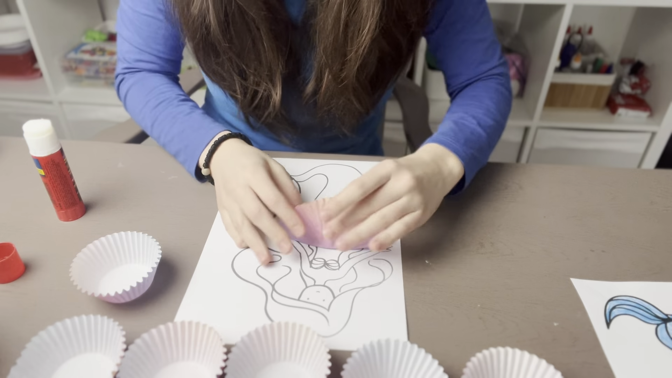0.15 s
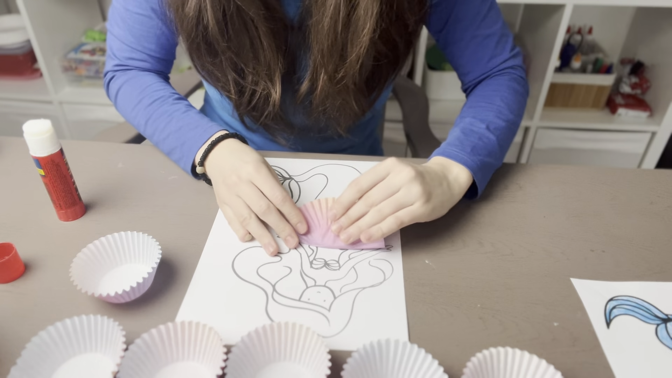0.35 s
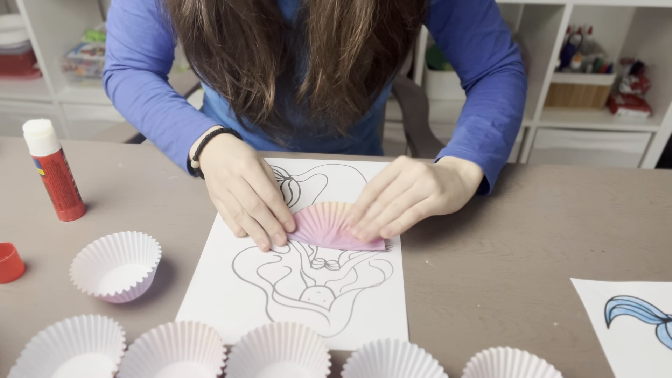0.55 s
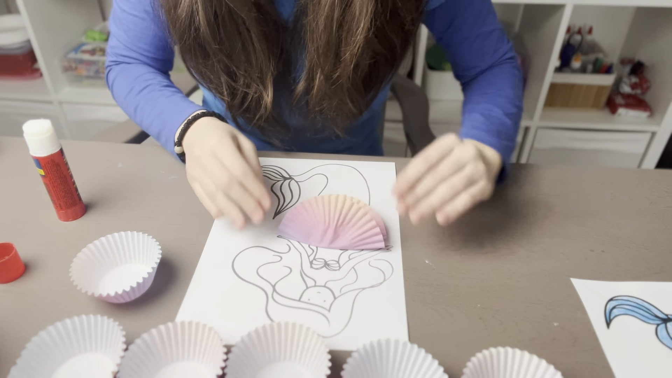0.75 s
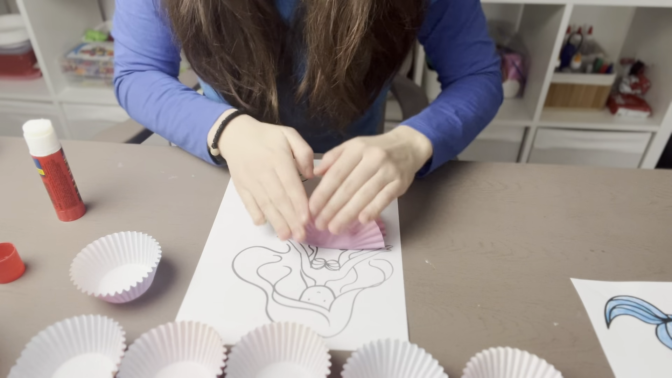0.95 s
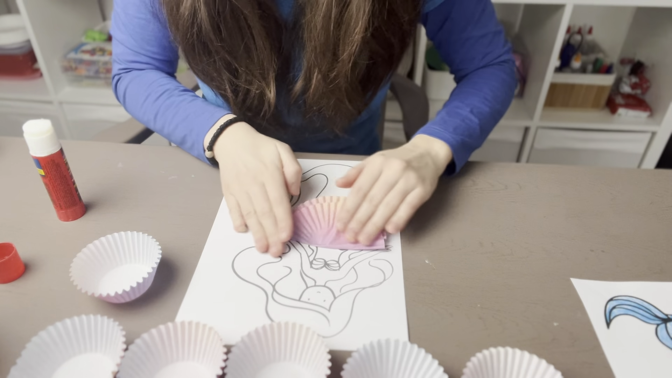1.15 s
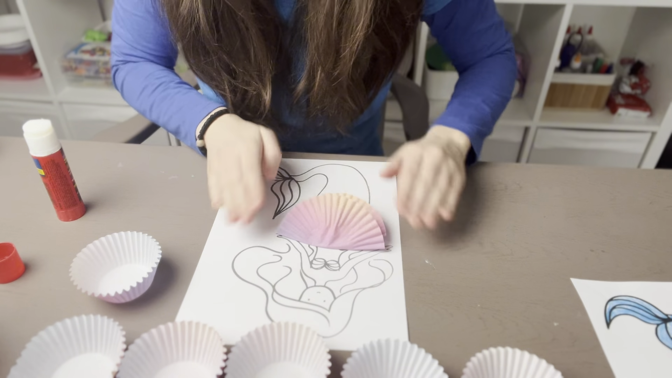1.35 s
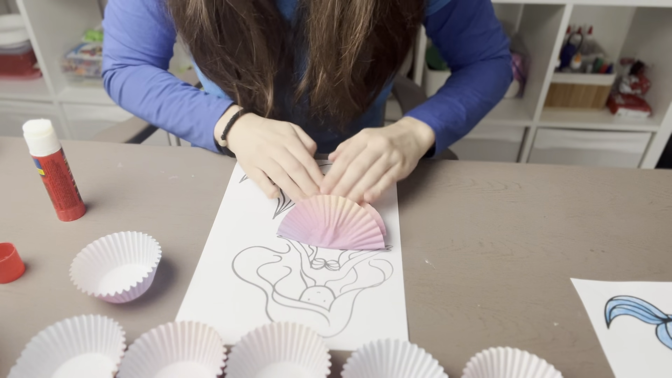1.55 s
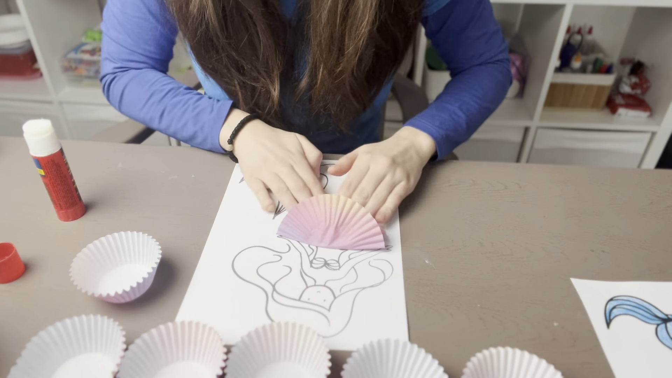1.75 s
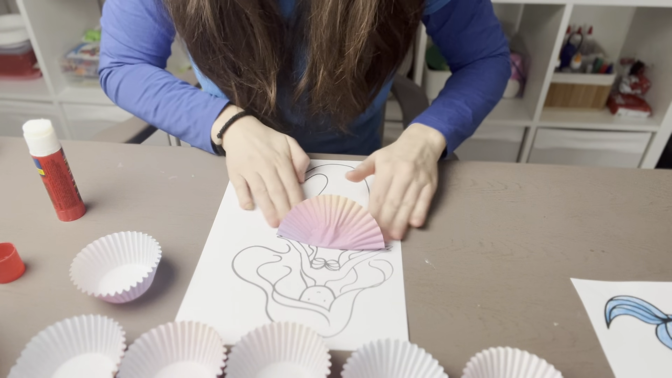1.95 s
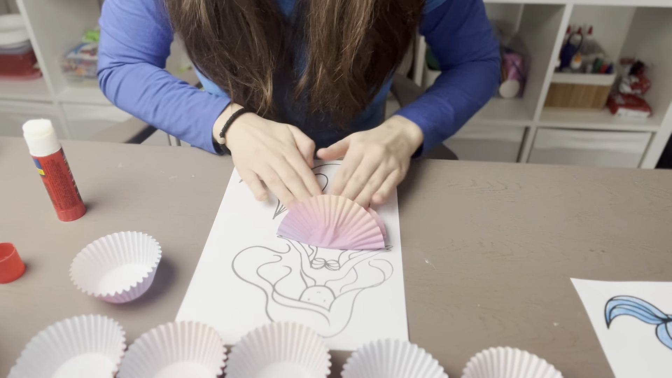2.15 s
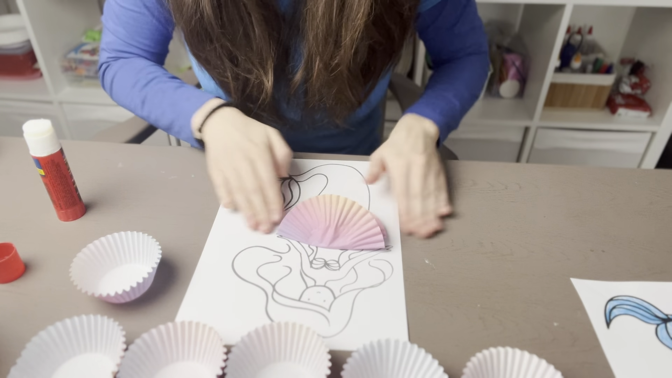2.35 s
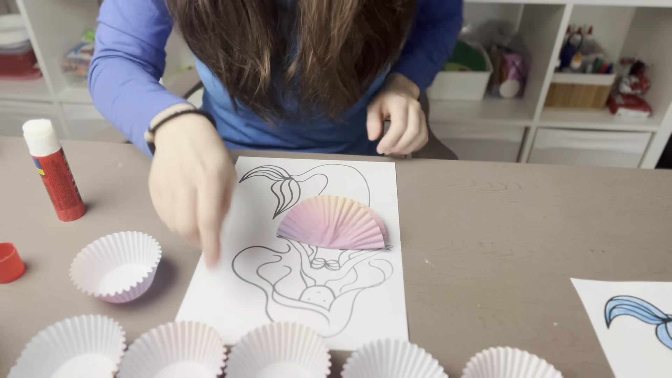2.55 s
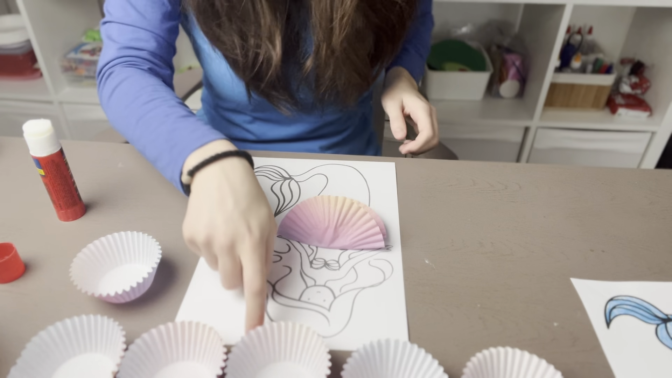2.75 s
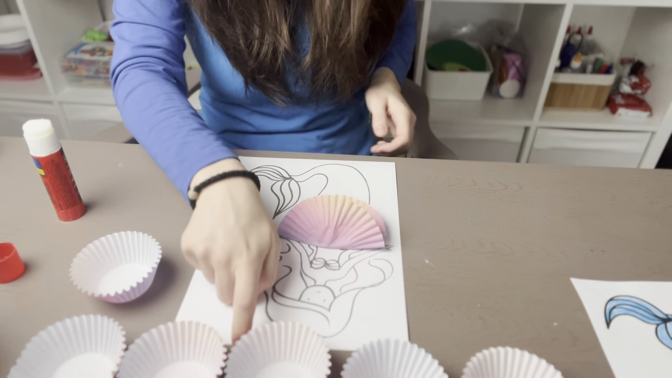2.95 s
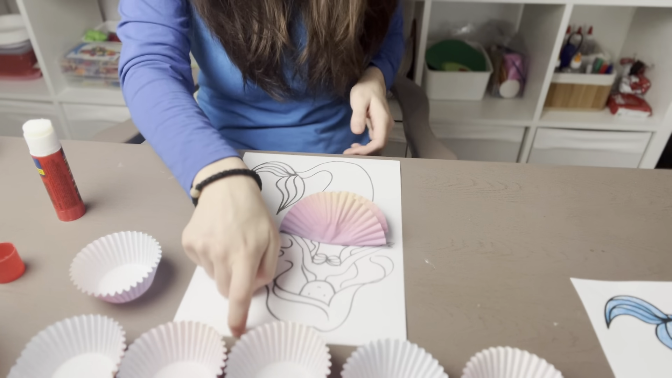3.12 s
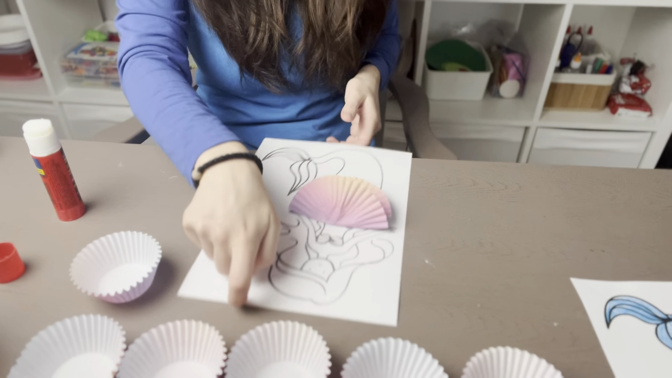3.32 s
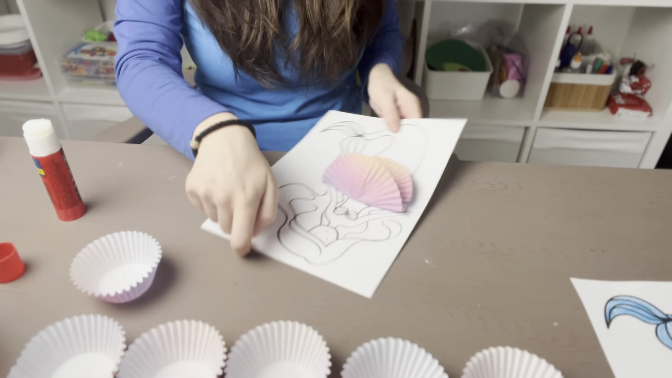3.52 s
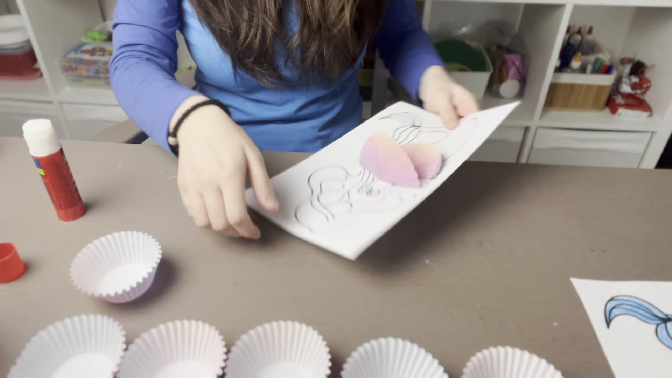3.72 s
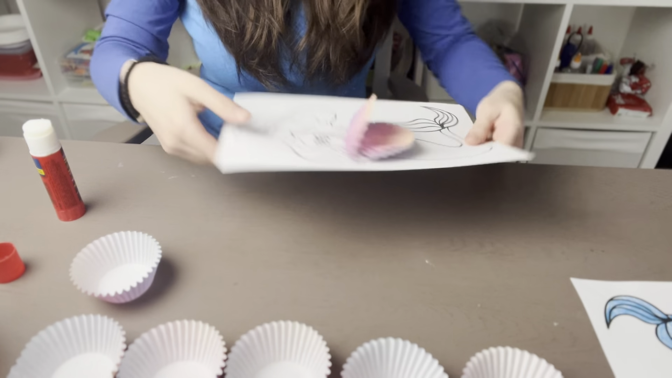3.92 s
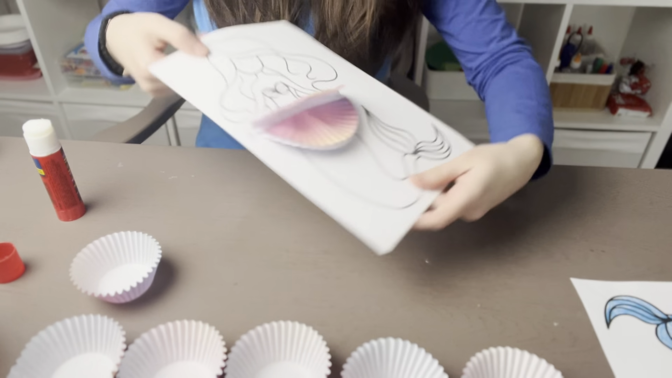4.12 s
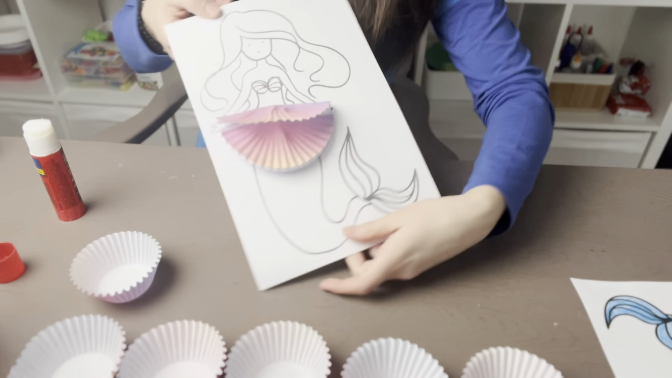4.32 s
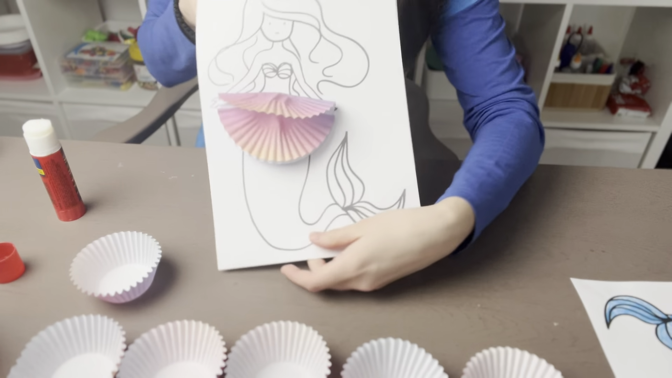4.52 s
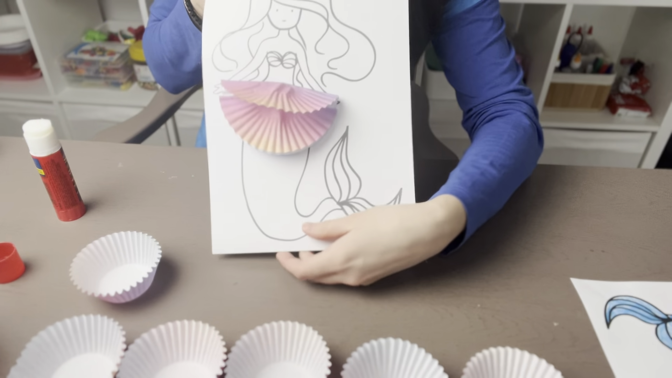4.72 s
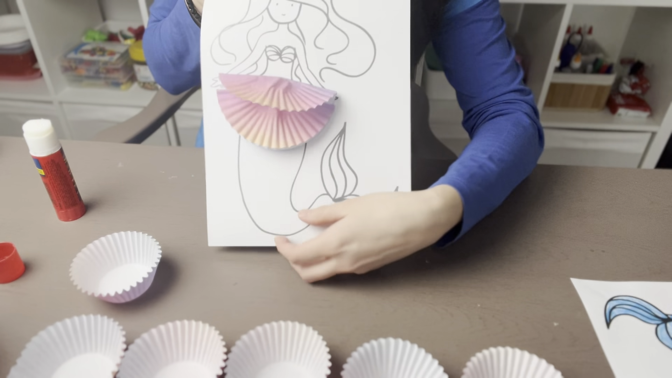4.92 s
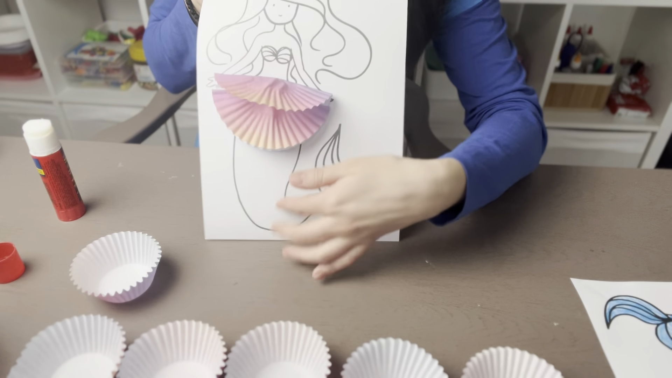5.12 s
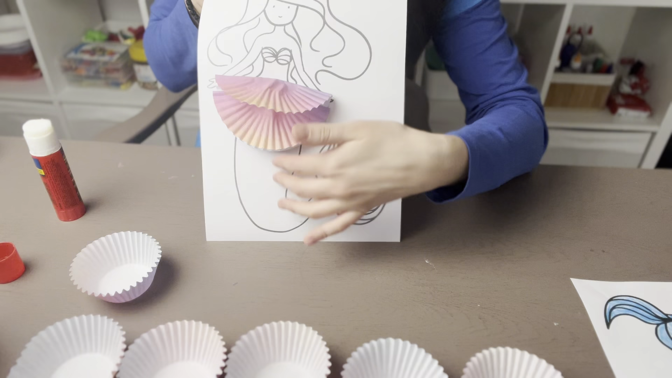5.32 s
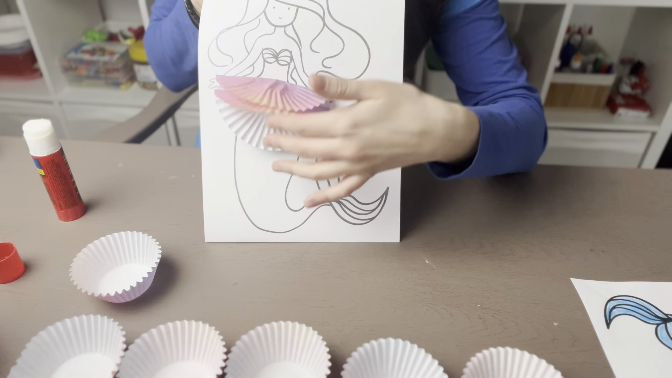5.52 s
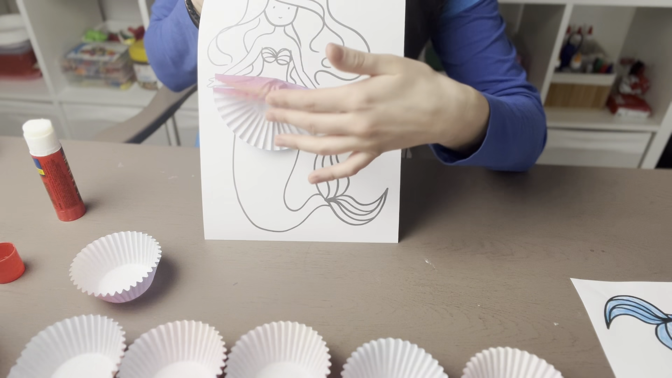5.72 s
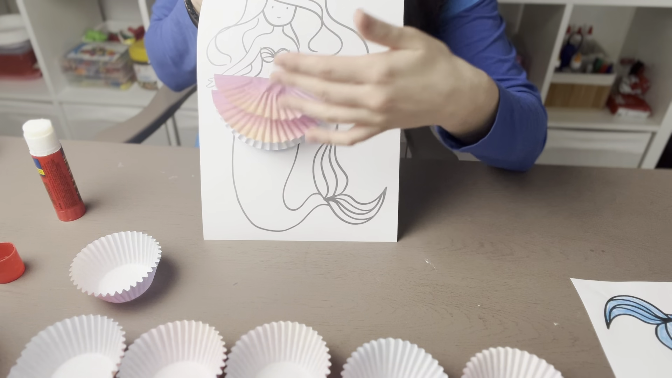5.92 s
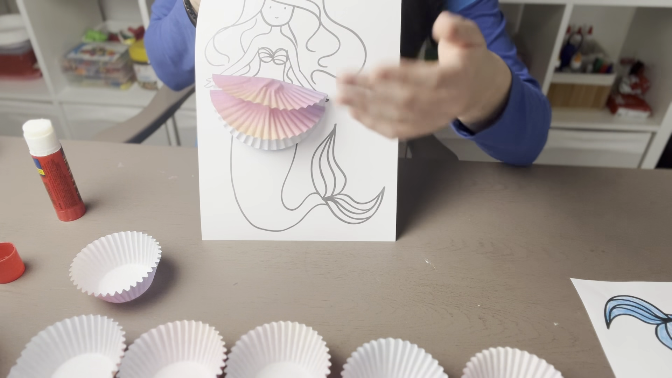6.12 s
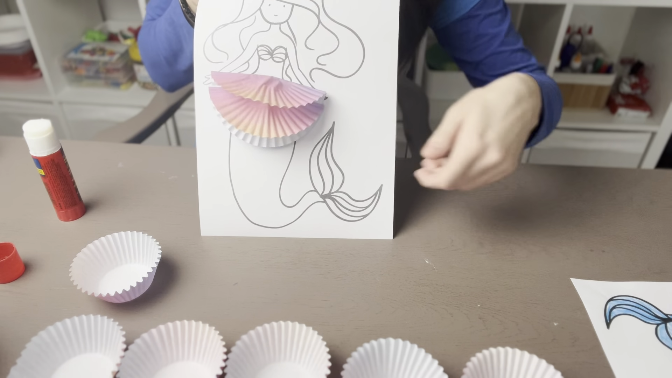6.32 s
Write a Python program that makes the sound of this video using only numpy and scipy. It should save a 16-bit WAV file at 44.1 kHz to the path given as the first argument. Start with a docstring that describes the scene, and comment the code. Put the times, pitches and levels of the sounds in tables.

```python
"""A table in a small quiet room, on a two-port stereo microphone; snaps and taps arrive mostly direct.
First, over still air and a faint hum, fingers press a pleated paper liner onto a drawing: strokes rustle
as fibres slip, buckling pleats snap, the sheet gives with pocks, and leaning arms make the table shudder.
After 3 s two pulls drag the sheet to the table's edge in stick-slip; it hisses as it is turned upright.
Just past 5 s it lands on its edge with a sharp tap, chatters and shivers; the liner is brushed open."""
import sys
import numpy as np
from scipy import signal
from scipy.fft import rfft, irfft, next_fast_len
from scipy.io import wavfile
from scipy.ndimage import map_coordinates

SR = 44100
rng = np.random.default_rng(int(sys.argv[2]) if len(sys.argv) > 2 else 0)


def inscribe(sig):
    """Save sig as 16-bit PCM at rate SR to the path in sys.argv[1].

    A 1-D sig is mono; a 2-D sig holds one channel per row.
    Samples are clipped to [-1, 1] before scaling.
    """
    pcm = np.round(np.clip(np.atleast_2d(sig).T, -1, 1) * 32767)
    wavfile.write(sys.argv[1], SR, pcm.astype(np.int16))


N = 285050  # samples

# Still air in the room, spectrum shape: f/Hz, level/dB
AIR = [(20, -19.5), (60, -10), (120, -8), (250, -13), (420, -13), (600, -13), (800, -16.5), (1150, -22),
       (1500, -19.5), (2000, -18), (2700, -15.5), (3800, -29.5), (5500, -29), (10000, -39.5),
       (16000, -53.5)]
# Steady tones of a faint appliance hum: f/Hz, level/dB
HUM = [(560, -83), (1443, -89), (2885, -88)]
# Decay of the room: f/Hz, t60/s
ROOM_DECAY = [(100, 1), (350, 0.81), (1000, 0.62), (3000, 0.46), (12000, 0.35)]
# Right-port lead as the sheet goes from flat to upright: t/s, lead/ms
BEARING = [(0, 0.082), (3.5, 0.087), (4.1, 0.032), (5.3, -0.025)]
# Arms leaning on the table: t/s, length/s, level/dB
LEANS = [(0.0, 0.1, -57.5), (0.32, 0.24, -54.5), (2.07, 0.48, -62), (2.48, 0.37, -58.5), (4.215, 0.3, -58),
         (4.752, 0.091, -48), (4.88, 0.59, -54.5), (5.912, 0.13, -52.5)]
# Dull rumble of the leaned-on table, spectrum shape: f/Hz, level/dB
RUMBLE = [(12, -47), (30, 19.5), (70, 15.5), (130, 0.5), (300, -101.0)]
# Finger strokes on the paper: t/s, length/s, crisp rustle gain/dB, soft skin brush gain/dB
STROKES = [(0.0, 0.04, -71, -65), (0.122, 0.061, -61, -58), (0.19, 0.087, -69.5, -68),
           (0.268, 0.13, -53, -54), (0.402, 0.032, -49, -46.5), (0.418, 0.15, -48, -58.5),
           (0.565, 0.09, -50.5, -54), (0.952, 0.0084, -57, -61), (0.965, 0.058, -84, -70),
           (1.005, 0.24, -53.5, -57.5), (1.135, 0.13, -54.5, -59.5), (1.547, 0.091, -71, -70),
           (1.651, 0.034, -56.5, -58.5), (1.711, 0.14, -52.5, -61), (1.846, 0.14, -54, -62.5),
           (2.125, 0.029, -63, -62), (2.223, 0.056, -56, -55), (2.26, 0.077, -53.5, -63),
           (3.009, 0.13, -57.5, -60.5), (3.802, 0.47, -57, -56.5), (4.251, 0.34, -63.5, -57.5),
           (4.665, 0.11, -65.5, -61), (4.864, 0.19, -62, -53.5), (5.133, 0.024, -61, -42),
           (5.206, 0.12, -65.5, -55.5), (5.37, 0.0073, -56.5, -67), (5.461, 0.024, -51.5, -47.5),
           (5.5, 0.17, -59, -63), (5.698, 0.051, -56, -52.5), (5.753, 0.079, -63, -55.5),
           (6.102, 0.069, -81, -58), (6.22, 0.1, -74, -57), (6.335, 0.15, -67.5, -56)]
# Pulls of the sheet over the table top: t/s, length/s, rise/s, judder gain/dB, hiss gain/dB
PULLS = [(3.086, 0.054, 0.048, -38, -63), (3.216, 0.51, 0.0014, -41, -48.5)]
# Paper fibres catching and slipping, spectrum shape: f/Hz, level/dB
PAPER = [(300, -28), (1000, -13), (2000, -9), (2700, -3), (3500, -4), (5000, 0), (7500, 0), (10000, -2),
         (12500, -6), (14500, -13), (16000, -17)]
# Skin and cloth rubbing, spectrum shape: f/Hz, level/dB
SKIN_AND_CLOTH = [(60, 13.5), (200, -3.5), (500, 2), (800, -2), (1200, -2.5), (2000, -7), (4000, -15),
                  (9000, -50)]
# Loudest pleats snapping: t/s, peak level/dB, ring f/Hz, burst t60/s,
# broad crack and sheet response/dB relative to the ring
SNAPS = [(0.123, -38, 6200, 0.0069, -33, -25), (0.154, -38, 7000, 0.038, -16, -23),
         (0.307, -31.5, 5930, 0.0075, -12, -6), (0.41, -25.5, 3100, 0.012, 3, 9),
         (0.432, -40, 3240, 0.0093, 8, 4), (0.4795, -25.5, 5250, 0.0095, -15, -23),
         (0.521, -32, 5490, 0.0098, -6, -20), (0.602, -26.5, 3000, 0.017, 10, 0),
         (0.6442, -22.5, 6630, 0.012, 3, 6), (0.6519, -16.5, 7050, 0.0042, -15, -17),
         (1.162, -18.5, 6200, 0.0073, -2, 0), (1.1694, -21.5, 2870, 0.0064, -5, -25),
         (1.182, -22, 4870, 0.0068, -14, -25), (1.274, -31, 7600, .01, 5, 4),
         (1.7953, -34, 7650, 0.011, -8, -16), (1.804, -23, 6560, .009, -19, -17),
         (1.813, -25, 7500, 0.012, -17, -21), (1.858, -33.5, 3500, 0.012, 5, -4),
         (1.9248, -39, 4400, 0.0087, -3, -25), (1.9945, -26.5, 7700, 0.015, -32, -40),
         (2.012, -21, 5770, 0.0084, -4, -13), (2.269, -30, 6800, 0.024, 2, 2),
         (2.2754, -13.5, 7200, 0.0064, -7, -18), (2.3162, -22, 6800, 0.011, -21, -25),
         (2.3363, -16.5, 6600, 0.0048, -4, -10), (2.343, -28.5, 6000, 0.0099, -3, 4),
         (5.168, -39, 6500, 0.014, -6.5, -20), (5.182, -46, 4000, .012, -8, -20),
         (5.204, -47, 6500, .014, -5, -15), (5.298, -44, 5800, 0.025, -4, -15),
         (5.37, -39.5, 6100, 0.02, -15, -17), (5.3857, -32, 6100, 0.02, -21, -18),
         (5.392, -35, 6000, 0.017, -14, -22), (5.409, -36, 6450, 0.013, -14, -7),
         (5.474, -36, 6000, 0.022, -13, -16), (5.5303, -26.5, 6960, 0.014, -32, -28),
         (5.725, -36, 7360, 0.051, -8, -10), (5.836, -34.5, 5500, 0.03, 6, 0),
         (5.87, -43.5, 5520, 0.029, -13, -11)]
# Fingers and sheet edge knocking on the table, before the frame rings:
# t/s, peak level/dB, brightness f/Hz, contact time/s
KNOCKS = [(0.153, -50, 400, 0.0027), (0.207, -50, 500, 0.0024), (0.411, -46.5, 1210, 0.00086),
          (0.433, -47, 700, 0.0032), (0.957, -56, 600, 0.0054), (2.276, -46, 603, 0.0044),
          (2.337, -46, 710, 0.0041), (3.073, -43.5, 300, 0.003), (3.106, -38, 330, 0.0065),
          (3.128, -35, 650, 0.0024), (3.146, -39, 900, 0.0018), (3.156, -45, 350, 0.0016),
          (3.224, -23.5, 1720, 0.003), (3.243, -28, 1490, 0.0013), (3.303, -35, 1100, .0015),
          (3.332, -35, 397, 0.003), (3.399, -34.5, 905, 0.0019), (3.508, -38.5, 800, 0.0026),
          (3.63, -44, 1400, 0.0014), (3.7165, -36.5, 605, 0.00095), (3.998, -47.5, 1210, 0.006),
          (4.332, -42, 248, 0.0041), (4.508, -46, 412, 0.0081), (4.555, -42.5, 453, 0.005),
          (5.045, -36, 395, 0.009), (5.105, -42.5, 2520, 0.0021), (5.4312, -30.5, 1010, 0.00057),
          (5.479, -37.5, 911, 0.0069), (5.592, -42, 600, 0.0058)]
# Modes of the table top with the sheet on it: f/Hz, width/Hz, level/dB
TABLE_MODES = [(211, 214, -6), (382, 99, 3), (615, 129, 3), (1060, 506, -1.5), (1650, 360, -21),
               (3420, 800, -24)]
# Modes of the table's longer-ringing frame: f/Hz, width/Hz, level/dB
FRAME_MODES = [(226.6, 5.3, 2), (310, 33, 3), (364, 17, -7), (441.7, 9.7, 7), (533, 16, -5), (716, 6.3, -6),
               (854, 8.7, -12)]
# Hollow pocks of the sheet under a fingertip: t/s, peak level/dB, ring f/Hz
POCKS = [(0.153, -49.5, 1080), (0.4335, -36.5, 980), (0.96, -55, 850), (1.002, -49, 443), (1.014, -48, 410),
         (1.06, -56, 1060), (1.209, -44, 900), (1.287, -45.5, 1690), (1.663, -57, 1350),
         (1.687, -45.5, 1090), (1.815, -46.5, 1110), (1.86, -52, 1190), (2.027, -51, 845),
         (2.144, -55, 1220), (2.3074, -41, 1310), (3.2265, -28.5, 990), (3.7162, -34, 514),
         (4.557, -42.5, 514), (4.992, -44.5, 680), (5.105, -48, 1500)]
# Skin sliding as fingers land, the sheet is turned upright and the hand leaves:
# t/s, length/s, level/dB, first f/Hz, last f/Hz, width/Hz
SWISHES = [(0.951, 0.024, -60.5, 1047, 1010, 650), (0.998, .07, -65, 1230, 997, 550),
           (3.906, 0.7, -64, 5600, 3890, 970), (4.958, 0.048, -68, 1444, 1300, 500),
           (6.36, 0.046, -68.5, 1200, 1395, 900), (6.404, 0.12, -56, 1350, 1595, 950)]
# Swells of the appliance's whine: t/s, length/s, f/Hz, level/dB
WHINES = [(1.466, 0.24, 1443, -74), (5.8, 0.26, 1500, -77), (5.55, 0.64, 2885, -75.5)]
# Wrists and elbows bumping the table, before it radiates: t/s, peak level/dB, ring f/Hz
THUMPS = [(2.278, -38.5, 92), (2.313, -46, 92), (3.598, -42.5, 125), (3.717, -42, 129), (4.34, -44.5, 134),
          (4.552, -48, 126), (5.145, -35.5, 122), (5.47, -42, 122)]
# Sheet dragged over the table, spectrum shape: f/Hz, level/dB
SCRAPE = [(30, -49), (130, -9), (190, -21), (300, -7), (450, -8), (720, -12.5), (870, -2.5), (1100, -22),
          (1500, -22), (2200, -24), (5000, -48)]
# Sheet edge dropped on the table, then chattering to rest, before the frame rings:
# t/s, peak level/dB, brightness f/Hz, contact time/s
TAP = [(5.1458, -14, 6000, 0.000073), (5.1555, -38, 3000, 0.000049), (5.1598, -32, 4000, 0.000078),
       (5.167, -28.5, 2500, 0.00026), (5.1795, -33, 3000, 0.00013)]
# Level change of the left-right average: f/Hz, level/dB
AVERAGE_LEVEL = [(7000, -2), (8800, -3), (10000, -26), (13000, -29.5), (14500, 2.5)]
# Unequal colour of the two ports: f/Hz, left minus right/dB
PORT_COLOUR = [(100, -2.6), (1000, -1.8), (2600, -1), (3500, -2.5), (5000, -4), (6000, 0), (7200, 4),
               (9300, 0)]

BAND_LIMIT_HZ = 15900
LEAN_ATTACK_S, LEAN_RELEASE_S, RESTING_DB = 0.023, 0.12, -66.5
# A stroke builds up over a share of its length, eases a little as it goes, and lets go
STROKE_RISE_SHARE, STROKE_EASE_DB_PER_S, STROKE_RELEASE_S = 0.63, 13, 0.0067
# As the sheet slides off the table the judder fades faster than the hiss
JUDDER_FADE_DB_PER_S, HISS_FADE_DB_PER_S, PULL_RELEASE_S = 67, 22, 0.0043
PULL_BRUSH_DB = 3.5  # the finger's own rub, relative to the hiss
SNAP_ATTACK_SHARE, FACET_WIDTH_SHARE = 0.018, 0.3  # of the burst's t60; of the ring frequency
SWISH_SETTLING_S = 0.22  # time constant of the pitch
SWISH_RISE_SHARE, SWISH_FADE_DB_PER_S = 0.12, 9


def amp(db):
    """Decibels to gain."""
    return 10 ** (np.asarray(db) / 20)


def unit(x):
    """Scale to rms 1."""
    return x / np.sqrt(np.mean(x ** 2) + 1e-20)


def along(points, hz):
    """Read (f/Hz, value) points on a log frequency axis."""
    f, value = np.transpose(points)
    return np.interp(np.log(hz + 1), np.log(f + 1), value)


def wobble(rate):
    """A smooth random curve, rate knots a second."""
    knots = rng.standard_normal(int(N * rate / SR) + 4)
    return map_coordinates(knots, [np.arange(N) * rate / SR])


def filtered(x, response):
    """Pass x through a complex response of frequency."""
    n = x.shape[-1]
    padded = next_fast_len(n + 4096)
    spectrum = rfft(x, padded) * response(np.fft.rfftfreq(padded, 1 / SR))
    return irfft(spectrum, padded)[..., :n]


def coloured(x, spectrum):
    """Shape x by a spectrum table, at rms 1."""
    return unit(filtered(x, lambda hz: amp(along(spectrum, hz))))


def resonance(f, centre, width):
    """Causal response of one mode."""
    return 1j * f * width / (centre ** 2 - f ** 2 + 1j * f * width)


def grains(rate, spread_db):
    """Random tiny slips of uneven size, rate a second, at rms 1."""
    chance, size = rng.random(N), rng.standard_normal(N)
    push = rng.choice([-1, 1], N)
    return unit((chance < rate / SR) * push * amp(spread_db * np.clip(size, -2, 2)))


def add(track, s, sound):
    """Mix a sound into a track at time s."""
    part = track[max(round(s * SR), 0):][:len(sound)]
    part += sound[:len(part)]


def gesture(s, length, attack, release, slope_db=0):
    """Gain of one movement: it rises, holds with a slope in dB per second, and dies away."""
    t = np.arange(N) / SR - s
    rise = np.clip(t / attack, 0, 1)
    hold = amp(slope_db * np.clip(t, 0, length))
    return rise * hold * np.exp(-np.maximum(t - length, 0) / release)


def room_tone(air_db=-68.0, side_db=-0.5, waver_db=3):
    """Still air as wide coloured noise, with a faint, slightly unsteady hum of sine tones."""
    mid, side = coloured(rng.standard_normal((2, N)), AIR)
    side = side * amp(side_db)
    t = np.arange(N) / SR
    hum = np.zeros(N)
    for hz, db in HUM:
        tone = unit(np.sin(2 * np.pi * hz * t + wobble(6.6)))
        hum += amp(db + waver_db * wobble(1.7)) * tone
    return amp(air_db) * np.array([mid + side, mid - side]) + hum


def room(x, alike_hz=250, build=0.00043):
    """The walls' answer builds up and dies: alike at both ports in the bass, unrelated in the treble."""
    hz, t, z = signal.stft(rng.standard_normal((2, SR // 2)), SR, nperseg=256)
    decay = amp(-60 * t / along(ROOM_DECAY, hz)[:, None])
    z = z * decay * (1 - np.exp(-t / build))
    turn = (np.pi / 4 * hz / (hz + alike_hz))[:, None]  # share moved from mid to side
    mid, side = signal.istft(z * np.array([np.cos(turn), np.sin(turn)]), SR, nperseg=256)[1]
    tail = np.array([mid + side, mid - side])
    return signal.fftconvolve(x[None], tail / np.linalg.norm(tail[0]), axes=1)[:, :N]


def placed(x, wet_db):
    """Direct sound reaches one port a little earlier; the room follows at wet_db."""
    n = np.arange(N)
    lead = np.interp(n / SR, *np.transpose(BEARING)) * SR / 1000  # ms to samples
    left = map_coordinates(x, [n - lead / 2])
    right = map_coordinates(x, [n + lead / 2])
    return np.array([left, right]) + amp(wet_db) * room(x)


def radiated(x, corner_hz):
    """A light panel moves little air below its corner frequency."""
    return filtered(x, lambda f: (1j * f / (corner_hz + 1j * f)) ** 4)


def shudder(sway_hz=53, rumble_db=-3, waver_db=1.5):
    """Under the arms the table's lowest mode swells and wavers, over a dull rumble."""
    leans = [amp(db) * gesture(s, length, LEAN_ATTACK_S, LEAN_RELEASE_S) for s, length, db in LEANS]
    level = np.maximum(amp(RESTING_DB), np.max(leans, axis=0))
    phase = 2 * np.pi * sway_hz * np.arange(N) / SR + 1.06 * wobble(41)
    sway = amp(waver_db * wobble(6.8)) * np.sin(phase)
    rumble = coloured(rng.standard_normal(N), RUMBLE)
    return level * unit(unit(sway) + amp(rumble_db) * rumble)


def rubbing_levels():
    """Gains of the crisp rustle and the soft brush; strokes and pulls overlap by adding in power."""
    crisp = np.zeros(N)
    for s, length, rise, _, hiss_db in PULLS:
        crisp += amp(hiss_db) * gesture(s, length, rise, PULL_RELEASE_S, -HISS_FADE_DB_PER_S)
    soft = amp(PULL_BRUSH_DB) * crisp
    for s, length, crisp_db, soft_db in STROKES:
        rise = STROKE_RISE_SHARE * length
        stroke = gesture(s, length, rise, STROKE_RELEASE_S, -STROKE_EASE_DB_PER_S)
        crisp = np.hypot(crisp, amp(crisp_db) * stroke)
        soft = np.hypot(soft, amp(soft_db) * stroke)
    return crisp, soft


def rustle(gain, crinkle_db=-6, low_hz=2600, high_hz=8300):
    """Paper fibres catch and slip in clumps over a smooth hiss; tiny creases tick at six pitches."""
    slips = grains(rate=900, spread_db=5) + amp(-5) * rng.standard_normal(N)
    clumps = amp(2.2 * wobble(90) + 1.3 * wobble(20))
    ticks = np.zeros(N)
    for hz in np.linspace(low_hz, high_hz, 6):
        ticks += filtered(grains(rate=110, spread_db=5), lambda f: resonance(f, hz, 1100) ** 2)
    return gain * clumps * (coloured(slips, PAPER) + amp(crinkle_db) * unit(ticks))


def brush(gain, flutter_db=2):
    """Skin and cloth give a softer, darker rub of dense slips."""
    rub = coloured(grains(rate=1500, spread_db=3.0), SKIN_AND_CLOTH)
    return gain * amp(flutter_db * wobble(45)) * rub


def snaps(crack_hz=5500, sheet_hz=1230, sheet_width_hz=1100):
    """A pleat buckles: a short burst rings its facet, with a broad crack and the sheet below in its own mix."""
    out, t = np.zeros(N), np.arange(SR // 20) / SR
    crack = lambda f: resonance(f, crack_hz, 10000) ** 2
    sheet = lambda f: resonance(f, sheet_hz, sheet_width_hz) ** 2
    for s, db, hz, t60, crack_db, sheet_db in SNAPS:
        attack = 1 - np.exp(-t / (SNAP_ATTACK_SHARE * t60))
        burst = rng.choice([-1, 1], len(t)) * amp(-60 * t / t60) * attack
        facet = lambda f: resonance(f, hz, FACET_WIDTH_SHARE * hz)
        snap = filtered(burst, lambda f: facet(f) + amp(crack_db) * crack(f) - amp(sheet_db) * sheet(f))
        add(out, s, amp(db) * snap / abs(snap).max())
    return out


def frame(x, ring_db):
    """The table passes a push on, and its frame keeps ringing."""
    modes = lambda f: sum(amp(db) * resonance(f, hz, width) for hz, width, db in FRAME_MODES)
    return filtered(x, lambda f: 1 + amp(ring_db) * modes(f))


def blows(rows, roughness, crack_db, ring_db):
    """Each contact pushes and scuffs the table's modes: a brief one clacks, a long one only rubs."""
    out, t = np.zeros(N), np.arange(SR // 6) / SR

    def body(f):
        """Table modes in alternating sign, plus a broad crack."""
        total = amp(crack_db) * resonance(f, 5600, 5600)
        for k, (hz, width, db) in enumerate(TABLE_MODES):
            total = total + (-1) ** k * amp(db) * resonance(f, hz, width)
        return total

    for s, db, bright_hz, contact in rows:
        scuff = 1 + roughness * rng.standard_normal(len(t))
        force = t * np.exp(-t / contact) * scuff
        knock = filtered(force, lambda f: body(f) / (1 + 1j * f / bright_hz) ** 2)
        add(out, s, amp(db) * knock / abs(knock).max())
    return frame(out, ring_db)


def pocks(width_share=0.51, t60=0.021):
    """A fingertip pushes a bulge out of the sheet, which rings briefly at its own pitch."""
    out, t = np.zeros(N), np.arange(SR // 12) / SR
    for s, db, hz in POCKS:
        push = rng.standard_normal(len(t)) * amp(-60 * t / t60)
        pock = filtered(push, lambda f: resonance(f, hz, width_share * hz) ** 2)
        add(out, s, amp(db) * pock / abs(pock).max())
    return out


def swish(release=0.015, flutter_db=3.5):
    """Sliding fingers hiss in a narrow noise band whose pitch glides and settles."""
    out, t = np.zeros(N), np.arange(SR) / SR
    for s, length, db, first_hz, last_hz, width_hz in SWISHES:
        pitch = last_hz + (first_hz - last_hz) * np.exp(-t / SWISH_SETTLING_S)
        a, b = filtered(rng.standard_normal((2, SR)), lambda f: 1 / (1 + (2 * f / width_hz) ** 2))
        carrier = np.exp(2j * np.pi * np.cumsum(pitch) / SR)  # lifts the slow noise to the pitch
        hiss = np.zeros(N)
        add(hiss, s, unit(np.real((a + 1j * b) * carrier)))
        slide = gesture(s, length, SWISH_RISE_SHARE * length, release, -SWISH_FADE_DB_PER_S)
        out += amp(db) * slide * hiss
    return out * amp(flutter_db * wobble(40))


def whine(rise_share=0.45, release=0.04):
    """A thin sine whine rises out of the hum and sinks back."""
    out, t = np.zeros(N), np.arange(N) / SR
    for s, length, hz, db in WHINES:
        tone = unit(np.sin(2 * np.pi * hz * t + wobble(8.1)))
        out += amp(db) * gesture(s, length, rise_share * length, release) * tone
    return out


def thumps(width_hz=40, t60=0.11):
    """A soft, heavy touch moves only a low mode of the table."""
    out, t = np.zeros(N), np.arange(SR // 4) / SR
    for s, db, hz in THUMPS:
        push = rng.standard_normal(len(t)) * amp(-60 * t / t60)
        thump = filtered(push, lambda f: resonance(f, hz, width_hz) / (1 + 1j * f / 120) ** 2)
        add(out, s, amp(db) * thump / abs(thump).max())
    return out


def drag(judder_db=2, dull_hz=600, hard_pull_db=-39):
    """The pressed sheet sticks and slips over the sounding table; a harder pull is brighter."""
    gain = np.zeros(N)
    for s, length, rise, db, _ in PULLS:
        gain += amp(db) * gesture(s, length, rise, PULL_RELEASE_S, -JUDDER_FADE_DB_PER_S)
    slips = grains(rate=260, spread_db=3)
    judder = amp(judder_db * wobble(80)) * coloured(slips, SCRAPE)
    dull = filtered(judder, lambda f: 1 / (1 + (f / dull_hz) ** 4))
    effort = np.sqrt(np.clip(gain / amp(hard_pull_db), 0, 1))
    return frame(gain * (dull + effort * (judder - dull)), ring_db=5.0)


def clack(db=-10, hz=880, t60=0.0078, attack=0.00042):
    """Landing on its edge, the stiff sheet flexes for a few cycles."""
    out, t = np.zeros(N), np.arange(SR // 20) / SR
    flex = np.sin(2 * np.pi * hz * t)
    add(out, TAP[0][0], amp(db - 60 * t / t60) * (1 - np.exp(-t / attack)) * flex)
    return out


def flutter(db=-46, hz=1400, width_hz=1100, release=0.053):
    """After the tap the upright sheet goes on shivering for a moment."""
    shiver = grains(rate=600, spread_db=3.5)
    rattle = unit(filtered(shiver, lambda f: resonance(f, hz, width_hz) ** 2))
    return amp(db) * gesture(TAP[0][0], 0, PULL_RELEASE_S, release) * rattle


def scene():
    """Paper, table and room together, each with its own share of room sound."""
    background = room_tone() + shudder() + whine()
    crisp, soft = rubbing_levels()
    paper = placed(rustle(crisp), wet_db=2.0)
    paper += placed(snaps(), wet_db=-11)
    paper += placed(pocks() + swish(), wet_db=-5.5)
    rubbing = radiated(brush(soft) + drag(), corner_hz=77.5)
    knocks = blows(KNOCKS, roughness=6.1, crack_db=-4, ring_db=-10)
    bumps = radiated(knocks + thumps(), corner_hz=52.3)
    tap = radiated(blows(TAP, roughness=0.15, crack_db=-12.5, ring_db=-4), corner_hz=79)
    table = placed(rubbing, wet_db=-2.0) + placed(bumps, wet_db=-6.0)
    landing = placed(tap + clack() + flutter(), wet_db=-10)
    return background + paper + table + landing


def record(dry):
    """Each port has its colour, and the band is limited."""
    average = dry.mean(axis=0)
    levelled = dry - average + filtered(average, lambda hz: amp(along(AVERAGE_LEVEL, hz)))
    colour = lambda hz: amp(np.outer([0.5, -0.5], along(PORT_COLOUR, hz)))
    return filtered(levelled, lambda hz: colour(hz) * (hz < BAND_LIMIT_HZ))


dry = scene()
out = record(dry)
inscribe(out)
```